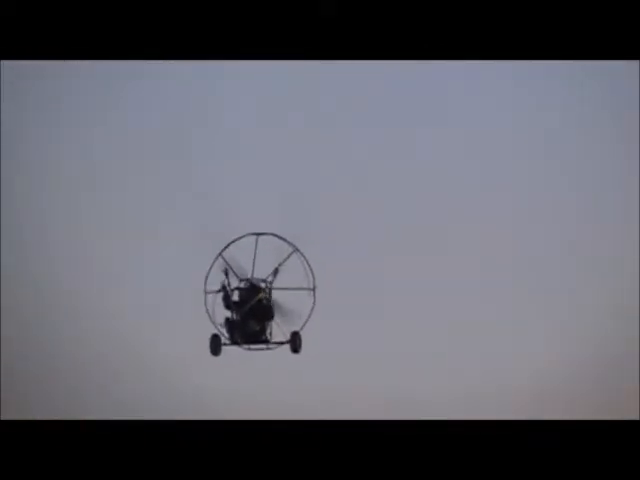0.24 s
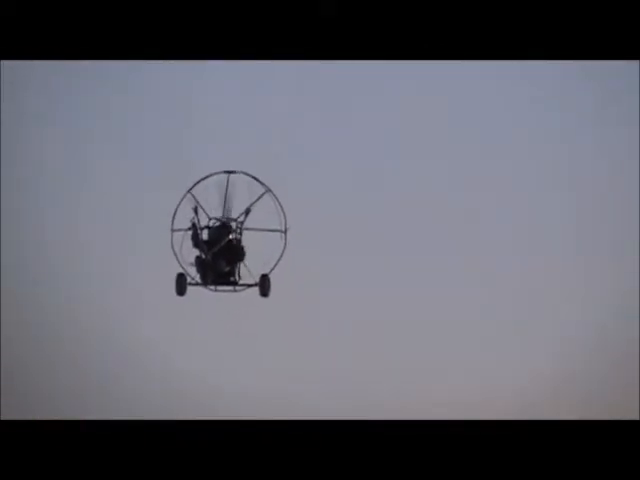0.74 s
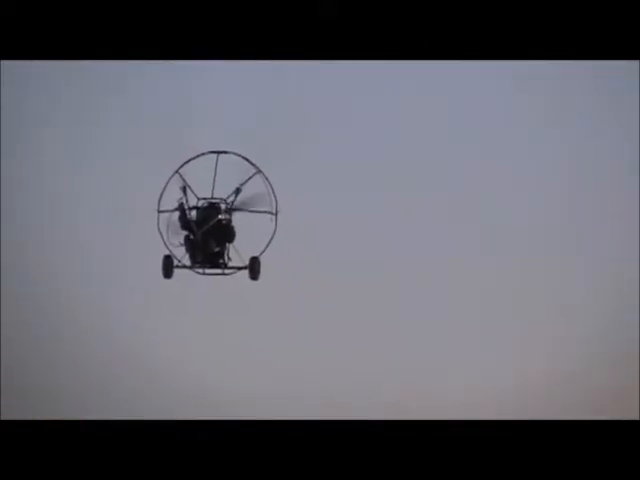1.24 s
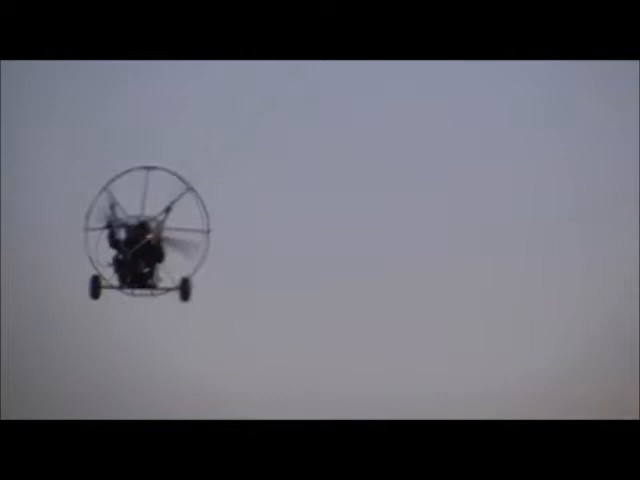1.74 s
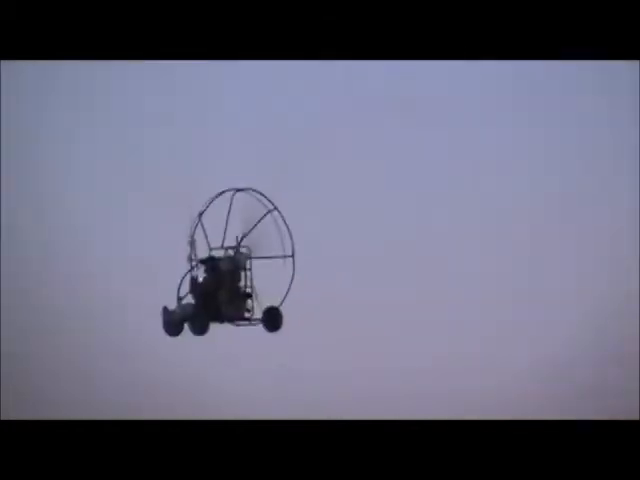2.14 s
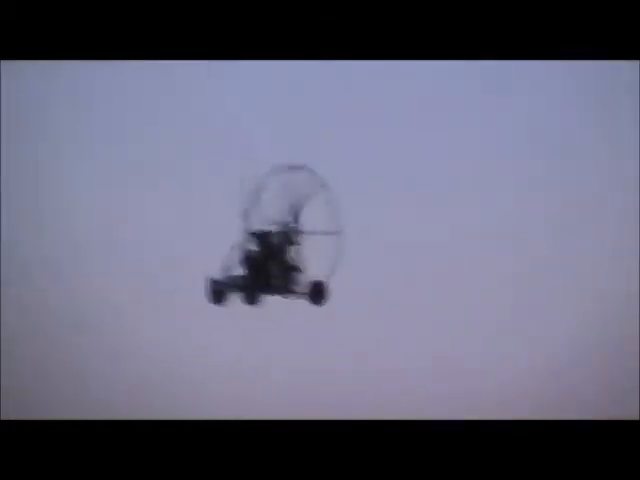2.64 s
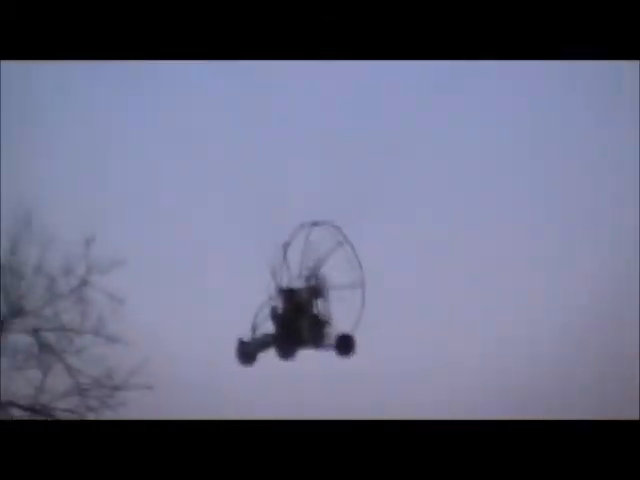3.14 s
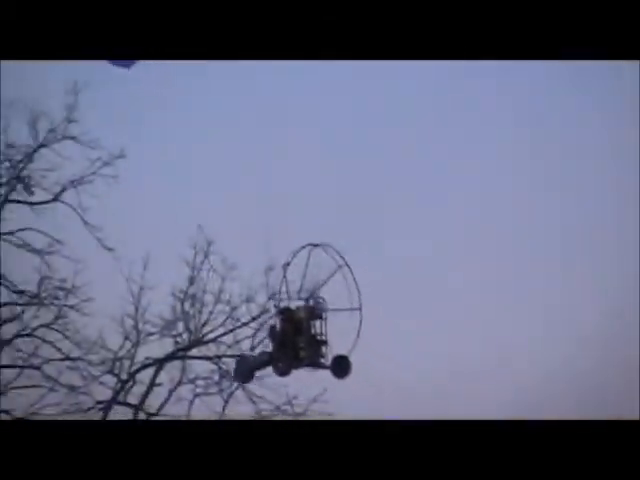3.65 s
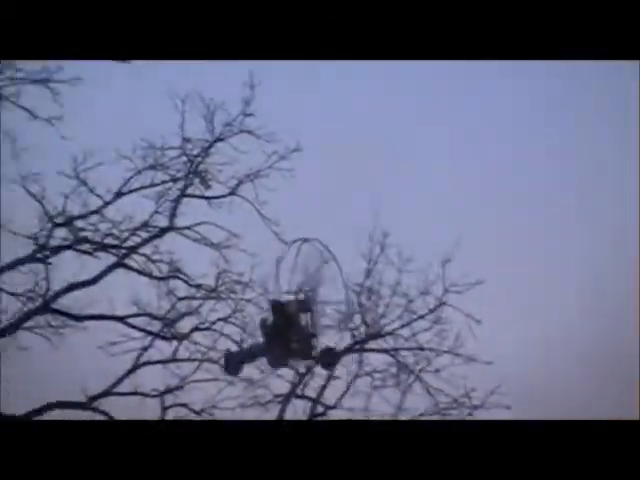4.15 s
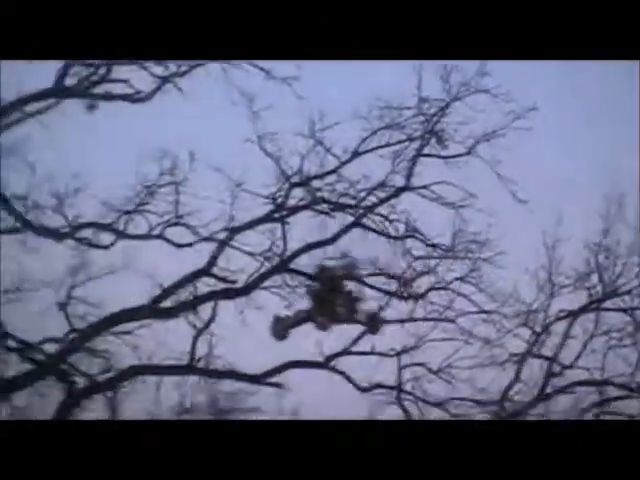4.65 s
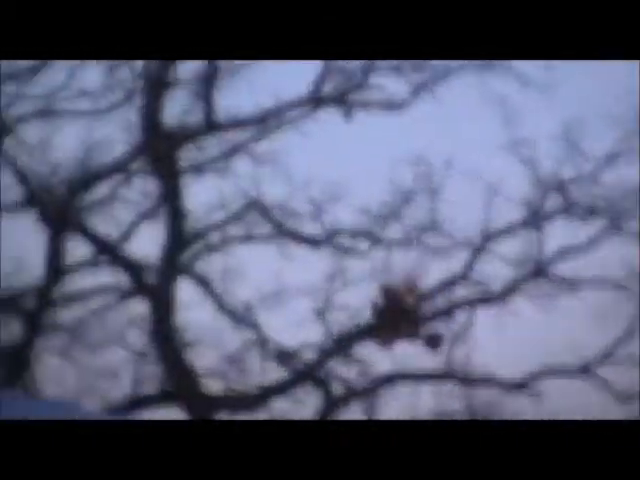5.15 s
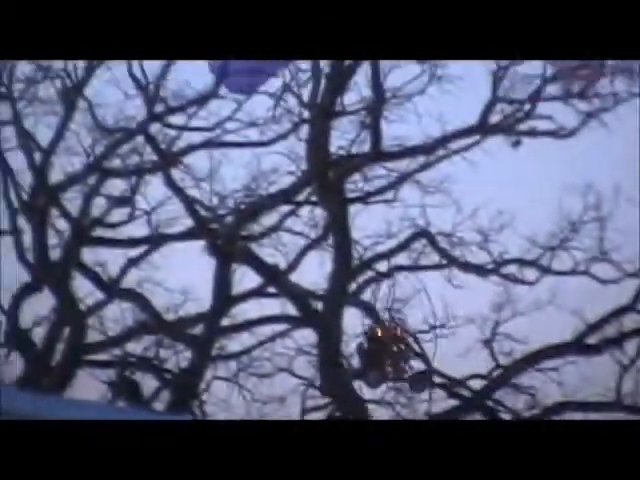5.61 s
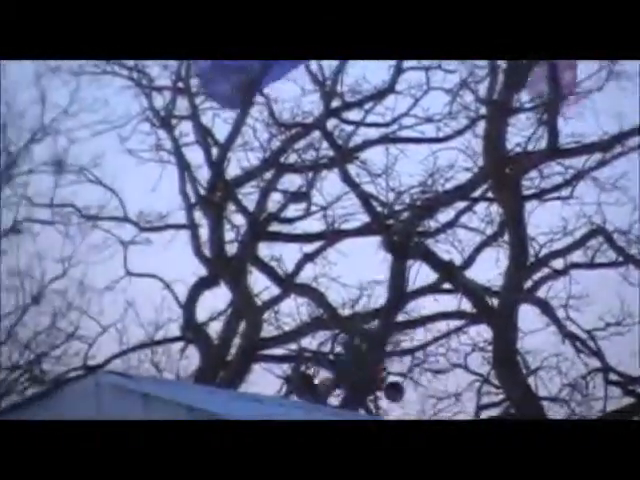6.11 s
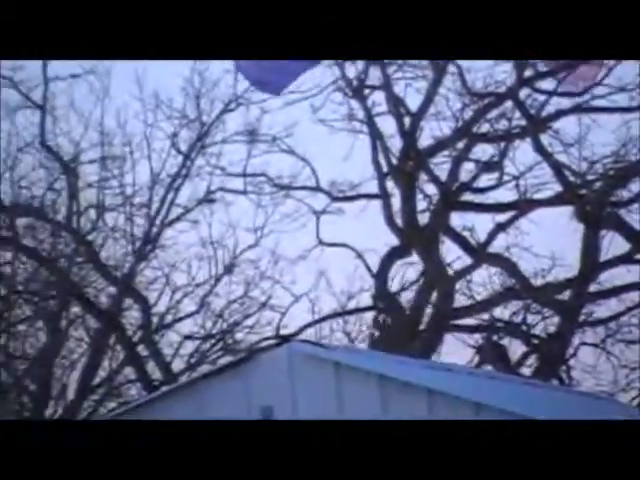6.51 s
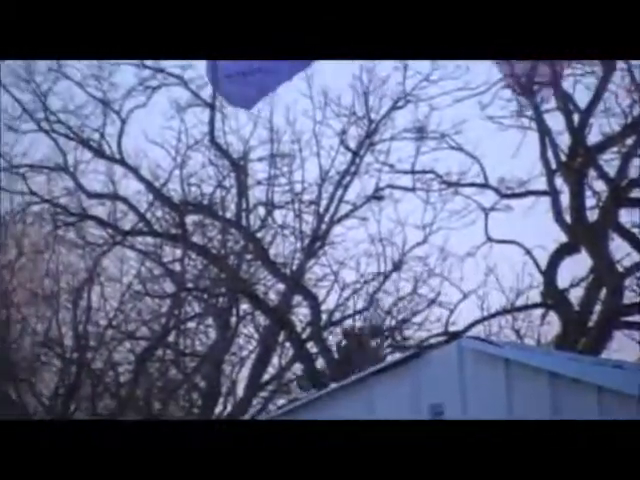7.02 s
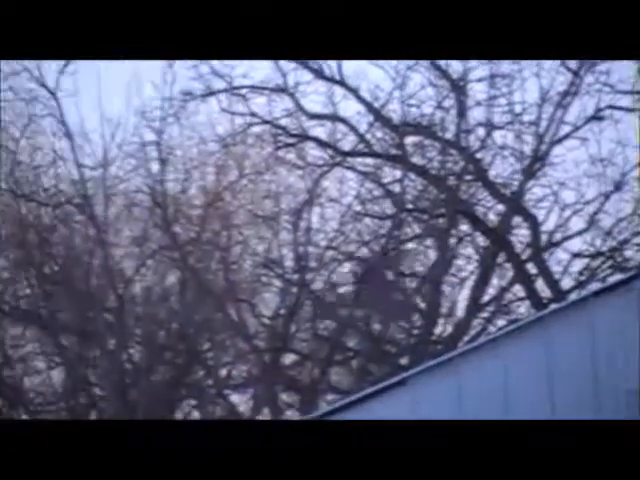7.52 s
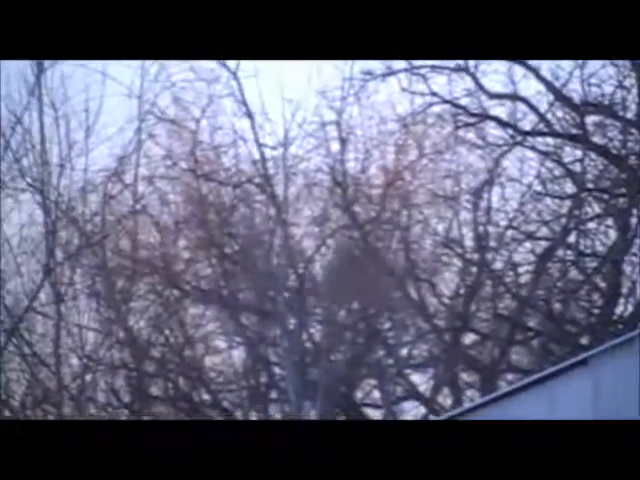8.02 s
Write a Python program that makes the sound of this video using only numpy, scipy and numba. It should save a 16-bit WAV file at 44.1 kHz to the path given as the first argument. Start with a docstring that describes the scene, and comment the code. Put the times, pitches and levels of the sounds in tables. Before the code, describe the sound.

A small propeller aircraft drones overhead in the open air, heard from the ground through a handheld camera's microphone. For the first two seconds its choppy propeller and thumping, lightly rattling engine slide down in pitch and grow quieter, with a faint tick at 0.5 seconds. Around 2 seconds fingers make a few sharp, close clicks on the plastic case, one far louder than anything else. At 2.1 seconds the sound jumps abruptly to a louder, faster buzz, with a thin gear whine that dies away by about 5 seconds. The drone wavers, with occasional harder blade slaps and a soft rush of air, sagging slightly in pitch and slowly fading as the craft flies off. It dulls briefly near 7 seconds. From about 8.1 seconds a quick cluster of close clicks and one short propeller slap sound over the continuing engine.

```python
"""A powered parachute trike, heard from the ground through a small camcorder's two unequal ports. First it
throttles back: propeller blades slap through the wakes of the cage struts, a four-stroke single thumps and
rattles, gears whine and air rushes past. Near 2 s fingers click on the plastic case, and the gain control ducks
after the loudest click. At 2.1 s the sound cuts to a second, faster pass, which fades as the craft turns and
flies off. After 8 s come more clicks and a sharp slap."""
import sys
import numpy as np
from scipy import signal
from scipy.fft import rfft, irfft, next_fast_len
from scipy.io import wavfile
from scipy.ndimage import uniform_filter1d
from numba import njit

SR = 44100
rng = np.random.default_rng(int(sys.argv[2]) if len(sys.argv) > 2 else 0)


def materialize(psi):
    """Save the field psi as 16-bit PCM at rate SR to the path in sys.argv[1].

    A 1-D psi becomes a single channel; in a 2-D psi each row is a channel.
    """
    bounded = np.clip(np.atleast_2d(psi).T, -1, 1)
    quanta = np.round(bounded * 32767).astype(np.int16)
    wavfile.write(sys.argv[1], SR, quanta)


N = 364707
CUT_S, TURN_S = 2.112, 3.  # start of the second pass; time the craft takes to turn
BLADES_PER_FIRING, MESHES_PER_FIRING = 1.755, 40

# Course of each pass: (time [s], blade rate [Hz], level [dB], treble level [dB])
THROTTLE_BACK = [(0.029, 39.52, -33.5, -4.5), (0.51, 38.53, -33.5, 2.5), (0.99, 36.72, -35.5, 2),
                 (1.23, 35.13, -36, 2.5), (1.471, 33.13, -37.5, 4.5), (1.71, 31.43, -39.5, 7.5),
                 (1.95, 29.5, -41.5, 12)]
FLY_OFF = [(2.13, 50.67, -28, -0.5), (2.558, 50.83, -29, 3.5), (2.991, 50.68, -28.5, -1.5),
           (3.421, 50.79, -29.5, 2), (3.849, 50.83, -30, 0.5), (4.28, 50.31, -31, 3),
           (5.141, 49.56, -33, 1.5), (5.57, 49.65, -34, -0.5), (5.998, 48.86, -34.5, 1.5),
           (6.86, 48.57, -34, -11), (7.29, 48.75, -36, -2.5), (7.719, 48.53, -35, 0.5),
           (8.15, 48.4, -35.5, 0), (8.26, 48.55, -35, 1.5)]
# Starting phases, per pass: (blade phase [cycles], engine phase [cycles])
START_PHASES = [(.05, .6), (.65, .88)]
# Strut wakes, per pass: (place in the blade period [0-1], level [dB])
STRUT_WAKES = [
    [(0, -0.5), (.2, -6.5), (.485, 0), (.76, -3.5)],
    [(0, -0.5), (.86, -13.5)],
]
# Unevenness of the slaps, per pass: (level scatter [dB], jitter [s])
SLAP_ROUGHNESS = [(1.3, .00004), (1.2, .00003)]
# Slaps that strike harder than the rest: (time [s], boost [dB])
HARD_SLAPS = [(2.316, 3.5), (2.669, 6), (2.709, 2), (2.807, 4.5), (2.945, 1.5), (3.673, 0.5), (3.87, 1),
              (3.967, 3), (4.007, 4), (4.187, 3.5), (4.425, 4), (4.785, 2.5), (5.126, 1.5), (5.307, 2.5),
              (5.55, 3.5), (5.731, 0.5), (5.916, 2), (5.997, 3.5), (6.16, 4.5), (7.186, 3), (8.028, 2)]
# Frame response, per pass: (multiple of the blade rate [1], gain at first [dB], gain once turned [dB])
FRAME_RESPONSE = [
    [(8, -5, -5), (12, -1.5, 2.5), (14, -1, 2), (17.2, -1.5, -1.5), (20, -3, -1), (23.05, -3, 2.5),
     (25.9, -5, -2.5), (30, -11.5, 0.5), (40.2, -9.5, -0.5)],
    [(7.05, -6, -2), (8, -1, -1), (8.8, -4, -3), (10.27, -8.5, -4.5), (11.98, 0, 0.5), (13.8, -5.5, -5),
     (15.48, -7, 2), (18.55, -2.5, -4.5), (22, -5, -5.5), (24.3, -3, -11), (26.9, -11.5, 2), (29.9, -5, -5),
     (32.06, 7.5, 9), (33.7, 6, 2), (37.4, 4, -7.5), (38.5, -1, -3.5)],
]
# Echoes in the muffler chambers: (lag [samples])
MUFFLER_LAGS = (211, 347, 523)
# Piston and valve knocks: (place in the engine cycle [0-1], level [dB])
KNOCKS = [(.04, 6.5), (0.408, 2.5)]
# Gear whine beaming past, per pass: (starting level [dB], fall [dB/s^2])
GEAR_BEAM = [(-48.5, 0.3), (-32, 3)]
# Filter for each source: (frequency [Hz], gain [dB])
SLAP_EQ = [(100, -12), (300, -6), (450, 1), (1000, 0), (1700, -2), (3000, -12), (6000, -22)]
BLADE_AIR_EQ = [(200, -16), (600, -8), (1700, -7), (3000, -9), (7000, -14)]
EXHAUST_EQ = [(60, -3), (87, 2), (113, -9), (145, 2), (175, 2), (230, 8), (275, -3), (340, -10), (405, -2),
              (480, -11), (1200, -5), (3000, -18.5)]
RATTLE_EQ = [(400, -20.5), (1500, -11), (3000, -0.5), (6000, 2.5)]
RUSH_EQ = [(60, -10.5), (300, 0.5), (1000, 2.5), (3000, 1), (7000, -1.5)]
# Joint response of air, ground and microphone, per pass: (frequency [Hz], gain [dB])
PATH_EQ = [
    [(30, -55), (150, -11), (260, -23), (480, 0.5), (850, -0.5), (1100, -10.5), (1500, -1.5), (2050, -12),
     (3000, -12), (3700, -26.5), (4800, -43), (6500, -44), (8500, -75), (12000, -72)],
    [(30, -47.5), (150, -6.5), (270, -21), (450, -1.5), (900, 0), (1330, -8), (1650, -1), (2300, -7),
     (3000, -5), (3800, -7.5), (4500, -24.5), (6500, -39), (8500, -56), (12000, -76.5)],
]
# Echoes off the ground and a nearby roof, per pass: (starting gain [dB], fall [dB/s], starting lag [ms], drift
# [ms/s])
REFLECTIONS = [
    [(-22.5, -1, 0.87, .02)],
    [(-10.5, 0.44, 0.645, 0.018), (-11, 3.5, 1.798, 0.16)],
]
# Edges between seven bands: (frequency [Hz])
BAND_EDGES = (110, 300, 1250, 2200, 3350, 4600)
# How far each band follows the treble level, per pass: (share [dB/dB])
TREBLE_SHARES = [(0.022, -0.009, 0.001, .15, 0.63, .8, .99), (-0.12, -.15, 0.0059, 0.14, 0.87, 0.49, .99)]
# Change in each band as the craft turns and draws away, per pass: (drift [dB/s])
BAND_DRIFTS = [(.5, 1.5, 0.0021, 0.1, 0.116, 0.092, 0.096), (-1.4, -0.6, 0.007, -0.05, -0.32, 2.15, -.1)]
# Finger clicks, and one propeller slap at 8.237 s rendered the same way: (time [s], peak [dB], tilt
# [dB/octave], contact [ms], crack relative to ring [dB])
CLICKS_AND_SLAP = [(0.509, -20, 10, 0.2, -29), (1.9854, -24, -9.5, 0.24, -18.5),
                   (1.9851, -11, -5.5, .5, -30.5), (1.988, -11.5, 4.5, .13, -20.5),
                   (2.0055, -3, -1.5, .2, -0.5), (2.0391, 15, 3, .1, -20), (2.1211, -11, 5, 0.25, -8),
                   (8.099, -18, 3, 0.15, -10), (8.172, -9, -5, 0.43, -8), (8.1738, -5, 1, 0.3, -2),
                   (8.1857, -8, 10, 0.38, 1), (8.193, -21, -7, 0.25, -7), (8.237, -21, -3, 0.33, -3),
                   (8.249, -14, 5, 0.26, -4)]
# Modes of the plastic case: (frequency [Hz], level [dB], time to fall 60 dB [s])
CASE_MODES = [(330, -6, .012), (800, -3, 0.012), (1200, 2, 0.008), (1800, -5, .006), (2400, 2, .005),
              (2950, 15, 0.004), (4540, -24.5, .006)]
# Scattering from trees and roof: (frequency [Hz], gain [dB])
SCATTER_EQ = [(100, -13.5), (1000, -20.5), (2000, -9.5), (5000, -9.5), (8000, -7.5)]
# Left port relative to right: (frequency [Hz], gain [dB], phase lead [rad])
LEFT_PORT = [(89.5, -1.5, -0.5), (247, -7.5, -0.93), (486, -9.5, 0.5), (990, -6.5, 0.65),
             (1775, -7.5, 0.88), (3110, -7, 1.67), (4470, -2.5, 4), (6020, 9.5, 3), (7050, 13.5, 4),
             (8260, 13, 5), (12000, -1, -4)]
# Shape of the electronic hiss: (frequency [Hz], gain [dB])
HISS_EQ = [(200, 9), (4000, -3.5), (9000, -18), (13000, -25), (15500, -33)]
# Electronic tones: (frequency [Hz], level before each channel's gain [dB])
TONES = [(10110, -88), (15735, -104)]


def trike(course, path_eq, struts, phases, roughness, shares, drifts, beam, echoes, frame):
    """Superposition: propeller, engine and gears share a shaft and add to the air's rush in one pass."""
    t = np.arange(N) / SR
    times, *columns = np.transpose(course)
    blade_hz, level_db, treble_db = (np.interp(t, times, c) for c in columns)
    elapsed = np.clip(t, times[0], times[-1]) - times[0]
    blades = np.cumsum(blade_hz) / SR
    blades -= blades[int(times[0] * SR)]
    cycles = blades / BLADES_PER_FIRING + phases[1]
    slap, blade_air = propeller(blades, blade_hz.max(), elapsed, phases[0], struts, roughness, frame)
    sources = ((slap, SLAP_EQ), (blade_air, BLADE_AIR_EQ), (exhaust(cycles), EXHAUST_EQ),
               (rattle(cycles), RATTLE_EQ), (rng.standard_normal(N), RUSH_EQ))
    direct = sum(colour(unit(x - x.mean()), path_eq, eq) for x, eq in sources)
    radiated = add_reflections(direct, elapsed, echoes)
    received = propagate(radiated, elapsed, treble_db, shares, drifts) * undb(level_db)
    return received + gear_whine(cycles, elapsed, *beam)


def propeller(blades, top_hz, elapsed, phase, struts, roughness, frame):
    """Blade-wake interaction: each strut wake that a blade crosses gives a slap and a puff of noise."""
    # Slaps are shaped at a steady shaft speed, then warped to the sliding one.
    steady = blades[0] + np.arange(N) * top_hz / SR
    warp = lambda x: np.interp(blades, steady, x)
    slaps = sum(pulses(steady + phase - place, db, *roughness) for place, db in struts)
    for time_s, db in HARD_SLAPS:
        slaps[np.abs(steady - blades[int(time_s * SR)]) < .35] *= undb(db)
    frame_eq = np.array(frame) * (top_hz, 1, 1)
    before, after = (warp(colour(slaps, frame_eq, column=k)) for k in (1, 2))
    turned = np.clip(elapsed / TURN_S, 0, 1)
    blade_air = warp(flare(slaps, rise_s=0.00046, decay_s=0.0028)) * rng.standard_normal(N)
    return before + turned * (after - before), blade_air


def exhaust(cycles):
    """All-pass dispersion: muffler echoes smear each firing pulse in time and leave its colour alone."""
    thumps = pulses(cycles, 0, scatter_db=1., jitter_s=.00006)
    for lag in MUFFLER_LAGS:
        taps = np.r_[1, np.zeros(lag - 1), -0.59]
        thumps = signal.lfilter(taps[::-1], taps, thumps)
    return thumps


def rattle(cycles):
    """Impact noise: piston and valve knocks each release a short, decaying burst."""
    knocks = sum(pulses(cycles - place, db, scatter_db=2.5, jitter_s=0.00066) for place, db in KNOCKS)
    return flare(knocks, rise_s=0.00074, decay_s=0.0046) * rng.standard_normal(N)


def gear_whine(cycles, elapsed, start_db, fall):
    """Beating: a sideband makes the mesh tone throb once a firing as its beam sweeps past."""
    mesh = 2 * np.pi * MESHES_PER_FIRING * cycles + 0.8 * wander(25)
    whine = np.sin(mesh) + undb(-12) * np.sin(mesh + 2 * np.pi * cycles)
    return whine * undb(start_db - fall * elapsed ** 2 + 1.8 * wander(12))


def add_reflections(x, elapsed, echoes):
    """Comb filtering: mid-treble echoes off the ground and a nearby roof arrive ever later as the craft turns
    away."""
    samples = np.arange(N)
    mid_treble = signal.sosfiltfilt(butter(2, (1200, 3700), "band"), x)
    for db, fall, lag_ms, drift in echoes:
        lag = (lag_ms + drift * elapsed) * SR / 1e3
        x = x + undb(db - fall * elapsed) * np.interp(samples - lag, samples, mid_treble)
    return x


def propagate(x, elapsed, treble_db, shares, drifts):
    """Directivity and scintillation: bands shift with heading and range, and flicker in turbulent air."""
    lows = [signal.sosfiltfilt(butter(4, hz, "low"), x) for hz in BAND_EDGES]
    bands = np.diff([0 * x, *lows, x], axis=0)
    out = np.zeros(N)
    for band, share, drift in zip(bands, shares, drifts):
        gain_db = share * treble_db + drift * (elapsed - elapsed[-1] / 2)
        out += undb(gain_db + 0.46 * wander(15)) * band
    return out / np.std(lows[2])  # relative to the sound below 1250 Hz


def case_ring(tilt_db, contact_ms, crack_db):
    """Modal ringing: a brief push, slips and a bounce excite the case; a longer push sounds duller."""
    t = np.arange(2000) / SR
    ring = sum(undb(db + tilt_db * np.log2(hz / 1500) - 60 * t / t60) * np.sin(2 * np.pi * hz * t)
               for hz, db, t60 in CASE_MODES)
    burst = np.exp(-t / 0.0019) * rng.standard_normal(len(t))
    crack = signal.sosfilt(butter(2, (600, 3600), "band"), burst)
    ring = ring / np.abs(ring).max() + undb(crack_db) * crack / np.abs(crack).max()
    contacts = undb(-18.5) * np.exp(-t / 0.0016) * rng.standard_normal(len(t))  # small slips
    contacts[0] = 1  # onset
    contacts[int(0.0055 * SR)] += undb(-27)  # bounce
    push = np.hanning(int(contact_ms * SR / 1000) + 3)
    ring = signal.fftconvolve(signal.fftconvolve(ring, contacts), push)[:len(t)]
    return ring / np.abs(ring).max()


def clicks_and_slap():
    """Two-path transmission: finger clicks, and one slap rendered like them; louder ones go more via the case."""
    air, case = np.zeros((2, N))
    for time_s, db, *timbre in CLICKS_AND_SLAP:
        i = int(time_s * SR)
        ring = undb(db) * case_ring(*timbre)[:N - i]
        share = np.clip(0.47 + .022 * db, 0, 1)
        air[i:i + len(ring)] += (1 - share) * ring
        case[i:i + len(ring)] += share * ring
    return signal.sosfilt(butter(2, 160, "high"), [air, case])


def scattering(craft):
    """Diffuse reflection: trees and roof return a short, exponentially decaying tail."""
    tail = rng.standard_normal(3000) * np.exp(-np.arange(3000) / 700)
    return colour(signal.fftconvolve(craft, tail / np.linalg.norm(tail))[:N], SCATTER_EQ)


def electronics():
    """Hiss and tones: each channel has its own hiss, and both carry two faint tones."""
    hiss = np.array([unit(colour(rng.standard_normal(N), HISS_EQ)) for _ in range(2)])
    tones = sum(undb(db) * np.sin(2 * np.pi * hz * np.arange(N) / SR) for hz, db in TONES)
    return undb(-59) * hiss + tones * np.array([[1.8], [.8]])


def left_port(x):
    """Transfer function: the left port hears the same wave with a different gain and phase."""
    size = next_fast_len(N)
    hz = np.arange(size // 2 + 1) * SR / size
    response = undb(lookup(LEFT_PORT, hz)) * np.exp(1j * lookup(LEFT_PORT, hz, column=2))
    return irfft(rfft(x, size) * response, size)[:N]


@njit
def gain_control(size, threshold, attack_s, release_s, restart):
    """Envelope following: gain drops after a peak over threshold, creeps back, and resets at restart."""
    attack, release = 1 / (attack_s * SR), 1 / (release_s * SR)
    gain, envelope = np.ones(len(size)), 0.
    for i in range(len(size)):
        rate = attack if size[i] > envelope else release
        envelope = 0. if i == restart else envelope + (size[i] - envelope) * rate
        gain[i] = min(1., threshold / (envelope + 1e-9))
    return gain


def pulses(cycles, db, scatter_db, jitter_s):
    """Quasi-periodic train: one impulse per whole cycle, shared between two samples."""
    count = np.arange(np.ceil(cycles[0]), np.floor(cycles[-1]))
    timing, strength = rng.standard_normal((N // 100, 2))[:len(count)].T
    at = np.clip(np.interp(count, cycles, np.arange(N)) + jitter_s * SR * timing, 0, N - 2)
    size = undb(db + scatter_db * strength)
    i = at.astype(int)
    return np.bincount(i, size * (1 + i - at), N) + np.bincount(i + 1, size * (at - i), N)


def flare(train, rise_s, decay_s):
    """Exponential relaxation: an envelope swells at each pulse and dies away."""
    for tau in (rise_s, decay_s):
        train = signal.lfilter([1], [1, -np.exp(-1 / (tau * SR))], train)
    return train


def wander(rate_hz):
    """Slow random modulation: held levels, smoothed twice, with a spread near 1."""
    hold = int(SR / rate_hz)
    steps = np.repeat(rng.standard_normal(N // hold + 1), hold)
    return 1.3 * uniform_filter1d(uniform_filter1d(steps, hold), hold)[:N]


def colour(x, *tables, column=1):
    """Minimum-phase filtering: the dB response is the sum of the tables."""
    hz = np.arange(1025) * SR / 2048
    cepstrum = irfft(sum(lookup(table, hz, column) for table in tables) * np.log(10) / 20)
    cepstrum[1:1024] *= 2  # folding makes the filter causal
    cepstrum[1025:] = 0
    return signal.fftconvolve(x, irfft(np.exp(rfft(cepstrum))))[:len(x)]


def lookup(table, hz, column=1):
    """Interpolation of a table column on a log-frequency axis."""
    table = np.array(table)
    return np.interp(np.log(hz + 1), np.log(table[:, 0]), table[:, column])


def butter(order, hz, kind):
    """Maximally flat filter, in second-order sections."""
    return signal.butter(order, hz, kind, fs=SR, output="sos")


def undb(db):
    """Amplitude ratio of a level in dB."""
    return 10 ** (np.asarray(db) / 20)


def unit(x):
    """Normalisation to rms 1."""
    return x / np.sqrt(np.mean(x ** 2))


def scene():
    """Superposition at two ports: two joined passes, clicks, scattering, hiss and tones."""
    passes = zip((THROTTLE_BACK, FLY_OFF), PATH_EQ, STRUT_WAKES, START_PHASES, SLAP_ROUGHNESS,
                 TREBLE_SHARES, BAND_DRIFTS, GEAR_BEAM, REFLECTIONS, FRAME_RESPONSE)
    first, second = (trike(*settings) for settings in passes)
    crossfade = np.clip((np.arange(N) / SR - CUT_S) / .001, 0, 1)
    craft = first + (second - first) * crossfade
    air, case = clicks_and_slap()
    # Vibration through the case pushes the ports in opposite ways.
    left = left_port(craft + air + scattering(craft)) - 1.2 * np.roll(case, 2)
    right = craft + air + case
    return np.array([left, right]) + electronics()


def record(dry):
    """Band and amplitude limiting: bass cut, gain control, clipping near full scale, steep top cut."""
    dry = signal.sosfilt(butter(2, 60, "high"), dry)
    size = np.abs(dry).max(axis=0)
    gain = gain_control(size, threshold=0.3, attack_s=0.0048, release_s=.3, restart=int(CUT_S * SR))
    top_cut = signal.ellip(8, .2, 70, 15800, fs=SR, output="sos")
    return signal.sosfilt(top_cut, np.clip(dry * gain, -.97, .97))


dry = scene()
out = record(dry)
materialize(out)
```